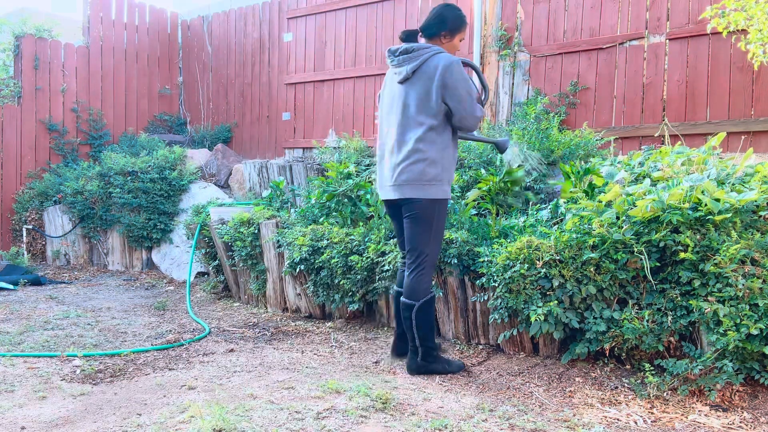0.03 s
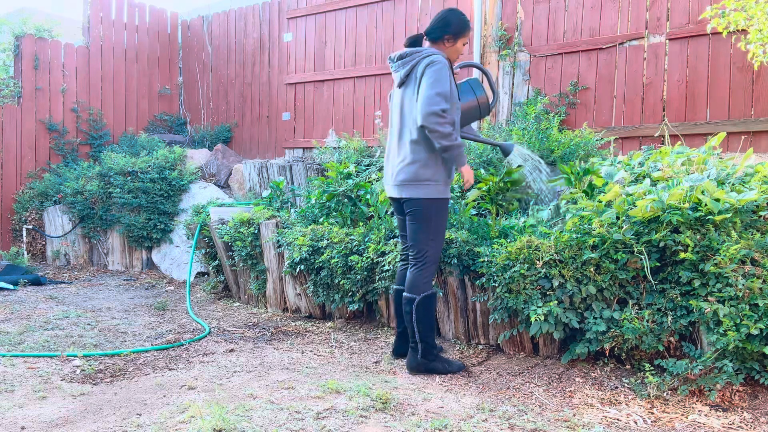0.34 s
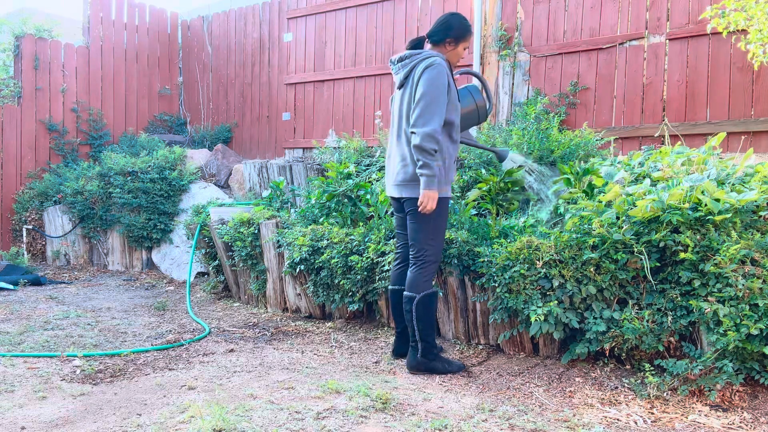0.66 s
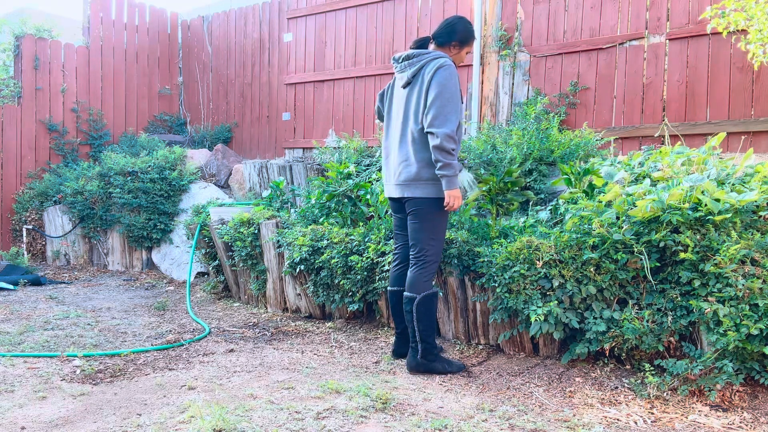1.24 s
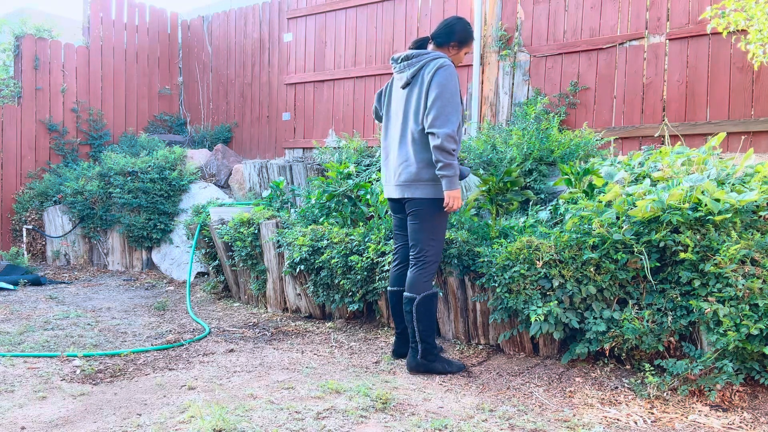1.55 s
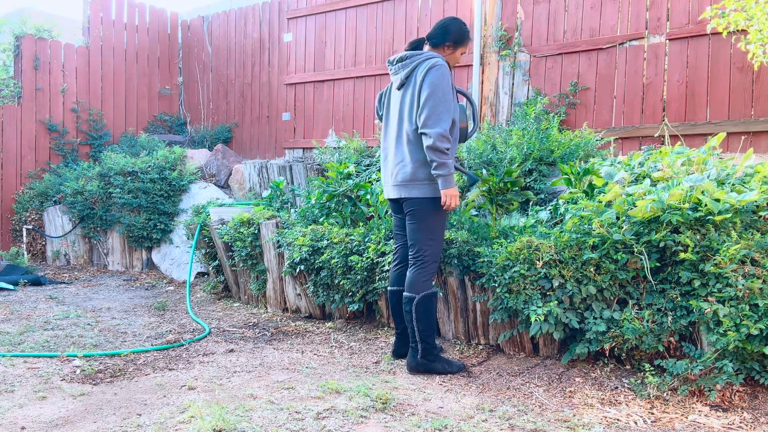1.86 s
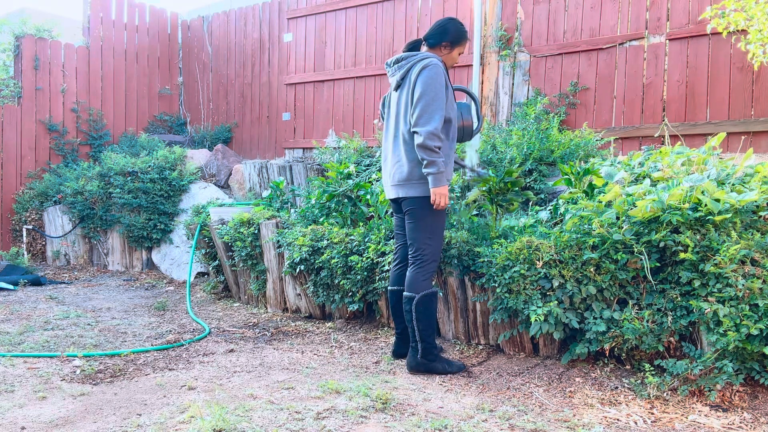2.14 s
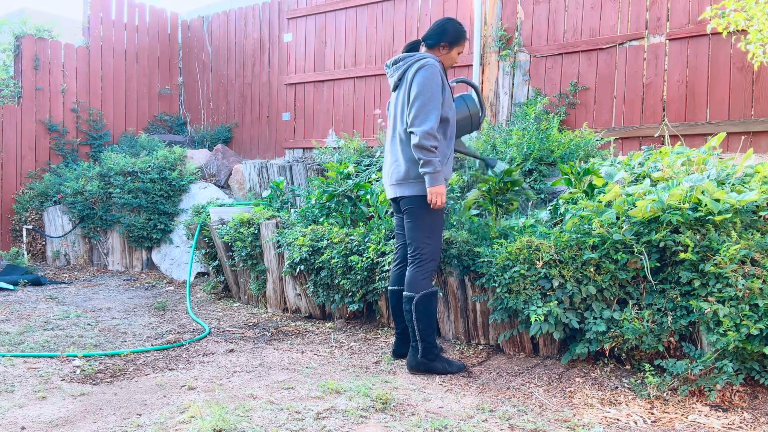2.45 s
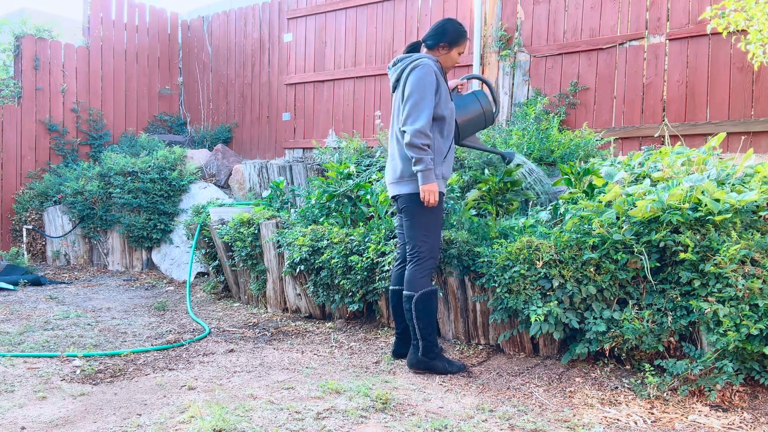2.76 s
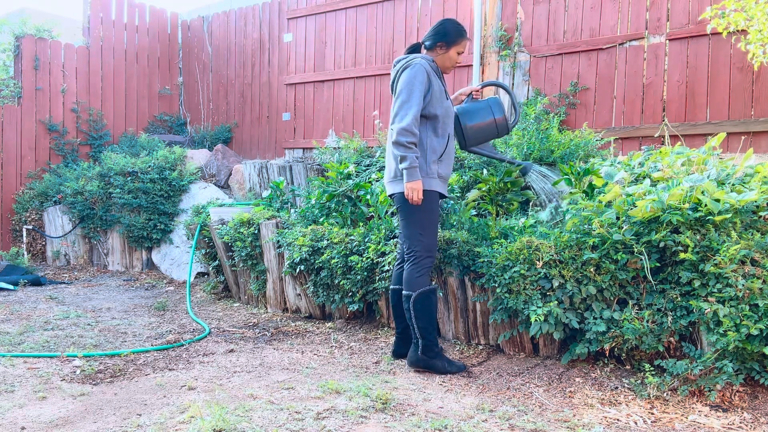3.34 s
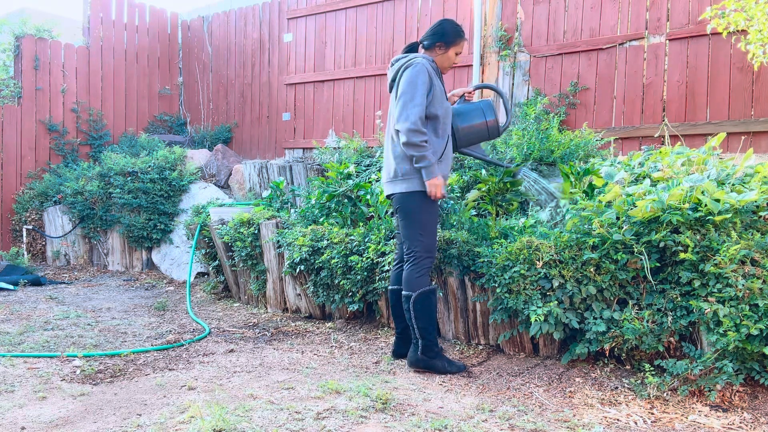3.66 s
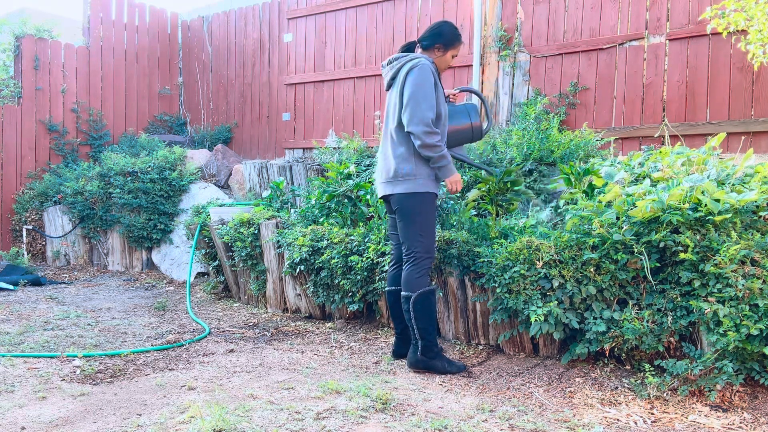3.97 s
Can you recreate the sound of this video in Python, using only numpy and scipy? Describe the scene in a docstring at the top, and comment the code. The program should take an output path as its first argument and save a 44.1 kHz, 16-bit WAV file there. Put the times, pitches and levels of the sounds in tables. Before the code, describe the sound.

A watering can sprinkles bushes, drops pattering softly on leaves. For the first second or so, rubber boots scuff and squeak on gritty soil. The spray thins from about 1.3 seconds and returns at 1.8, with small clicks and leaf rustles until 2.5. Gentle sprinkling continues to 4 seconds with scattered ticks. A steady low electric hum, distant rumble and outdoor air run throughout.

```python
"""Boots scuff on gritty soil with short squeaks: sand rings, crumbs crush, rubber soles rasp.
A watering can sprinkles bushes in a fenced yard, drops pattering on leaves over a soft wash.
The spray thins, leaves rustle as the can swings back, and the spray returns softly with small ticks.
A steady electric hum, a distant rumble and outdoor air lie underneath."""
import sys
import numpy as np
from scipy import signal
from scipy.fft import rfft, irfft
from scipy.io import wavfile
from scipy.ndimage import uniform_filter1d

SR = 44100
rng = np.random.default_rng(int(sys.argv[2]) if len(sys.argv) > 2 else 0)


def unload_wav(signal):
    """Save mono or channel-first audio to the path in sys.argv[1] as 16-bit WAV at rate SR, clipped to [-1, 1]."""
    wavfile.write(
        sys.argv[1],
        SR,
        np.round(np.clip(np.atleast_2d(signal).T, -1, 1) * 32767).astype(np.int16),
    )


N = 176400

# boot scuffs: t/s, length/s, grit level/dB, crunch level/dB, sole level/dB, sole start f/Hz, end f/Hz
BOOT_SCUFFS = [(0.0, 0.04, -67, -55, -55, 480, 850), (.027, 0.043, -50.5, -44.5, -49, 1200, 1710),
               (.068, 0.033, -58, -57, -55, 1610, 1310), (.098, 0.033, -49, -50, -52, 920, 700),
               (.138, .08, -51, -54, -53.5, 875, 1080), (.236, .025, -46.5, -57, -52.5, 910, 1080),
               (.265, 0.028, -57, -55, -53, 1490, 1040), (.298, 0.065, -57, -58.5, -56, 1100, 855),
               (.37, 0.063, -63.5, -61.5, -56.5, 1120, 604), (.45, 0.039, -64, -61, -58.5, 1040, 1580),
               (.493, 0.019, -51, -50, -53.5, 1520, 1370), (.52, .028, -60, -68, -67, 1500, 1500),
               (.563, 0.015, -52, -55, -48.5, 1360, 1250), (.587, .028, -52.5, -52.5, -48, 1170, 1020),
               (.618, 0.037, -60, -58, -55, 884, 840), (.775, 0.022, -65, -72, -59, 1750, 1530),
               (.826, 0.031, -59.5, -58.5, -52.5, 1050, 1310), (.868, 0.026, -65, -62, -57.5, 1580, 1790),
               (.993, 0.0193, -59, -65, -58, 1100, 1090), (1.15, 0.058, -70, -63.5, -55, 990, 1340)]
# sand sliding under a boot: f/Hz, relative level/dB
GRIT_SPECTRUM = [(1500, -13), (3000, -4), (4400, -8.5), (5600, -4.5), (6600, -1), (8000, -1), (9800, -2.5),
                 (11500, -20), (16000, -28)]
# sand grain resonances: f/Hz, width/Hz, gain
SAND_RINGS = [(5900, 110, 1.6), (6380, 120, 1.5), (6720, 120, 1.5), (7170, 130, 1.3), (7650, 100, 1.1)]
# crushed soil crumbs: f/Hz, relative level/dB
CRUNCH_SPECTRUM = [(300, -10.5), (1000, -4), (2200, -2.5), (3500, -6), (5500, -3.5), (9000, -9),
                   (12500, -13), (16000, -20)]
# spray landing on leaves: t/s, level/dB
SPRAY_LEVELS = [(0, -58.5), (.85, -60.5), (.93, -66.5), (1.1, -61), (1.35, -67), (1.55, -66.5), (1.68, -73),
                (1.82, -59.5), (2.4, -62), (2.7, -64.5), (3.02, -62), (3.15, -63.5), (3.35, -61.5),
                (3.7, -61), (4, -62.5)]
# fine drops on leaves: f/Hz, relative level/dB
DROP_SPECTRUM = [(300, -11), (900, -6.5), (1600, 0), (2500, 2.5), (4000, 0), (6500, -2), (10000, -5),
                 (12500, -10.5), (16000, -4.5)]
# wash of water in the bushes: t/s, level/dB
WASH_LEVELS = [(0, -60), (.9, -65), (1.25, -60.5), (1.7, -66), (2.15, -62.5), (2.4, -59.5), (2.9, -64),
               (3.3, -67.5), (4, -72)]
# electric hum lines: f/Hz, level/dB
HUM_LINES = [(120.0, -38), (178.9, -60.5), (196.7, -60.5), (238.5, -67.5), (250.2, -66.5), (310, -76.5),
             (417.4, -71.5), (447, -73), (676, -74.5), (1976, -81)]
# distant rumble: f/Hz, relative level/dB
RUMBLE_SPECTRUM = [(20, -20), (30, -21), (40, -9), (56, 3.5), (75, -0.5), (95, -3), (125, -1), (160, -7),
                   (200, -9), (250, -16), (320, -23), (600, -53.5)]
# outdoor air: f/Hz, relative level/dB
AIR_SPECTRUM = [(150, -10.5), (350, -4), (550, 4), (1050, -1), (1500, -4), (2200, -10), (4000, -17),
                (7500, -21), (10000, -19.5), (12500, -30), (15500, -25)]
# short squeaks during the boot scuffs, then small ticks: t/s, level/dB, f/Hz, width/oct, decay/s
SQUEAKS_AND_TICKS = [(.051, -43, 1610, 0.12, 0.012), (.056, -48, 2310, .08, .008),
                     (.081, -49, 5720, .02, .016), (.173, -45.5, 1964, 0.037, .014),
                     (.501, -48.5, 2800, 0.15, .009), (.571, -53, 2980, .08, .007),
                     (1.457, -58.5, 10000, .6, .003), (1.879, -49, 2600, .35, 0.0044),
                     (1.882, -44, 1210, .18, 0.0068), (1.923, -56, 11000, .15, .004),
                     (1.966, -48, 2480, 0.46, .007), (1.996, -52.5, 4630, 0.1, .005),
                     (2.073, -50.5, 4400, .3, 0.0036), (2.083, -52, 4300, .2, .004),
                     (2.306, -56, 7000, .4, .002), (2.322, -54, 13500, .16, .012),
                     (2.457, -57, 9000, 0.78, 0.0027), (2.73, -61, 10000, .5, .003),
                     (2.992, -57, 7000, 0.43, .004), (3.004, -58, 9500, .3, .004),
                     (3.68, -60, 4300, .12, .008), (3.729, -60, 3900, 0.26, .005),
                     (3.787, -58, 11000, .4, .003), (3.877, -45, 3100, 0.21, 0.007),
                     (3.92, -51.5, 8000, 0.74, .003), (3.991, -57, 10000, .5, .003)]
# leaves brushing past the can: t/s, length/s, level/dB, centre f/Hz
LEAF_RUSTLES = [(1.79, 0.13, -69, 8000), (1.963, 0.015, -54, 6400), (1.99, .04, -65, 5000),
                (2.048, 0.038, -57.5, 6500), (2.095, 0.047, -57, 9200), (2.145, 0.044, -58.5, 6960),
                (2.2, .05, -73, 8000), (2.26, 0.063, -62, 7000), (2.45, 0.027, -60, 7450),
                (3.285, 0.048, -64, 7500), (3.398, 0.027, -61.5, 4800), (3.63, .035, -64, 7000),
                (3.92, .035, -64, 7000)]

GRAINS_PER_S, GRAIN_SPREAD_DB = 10000, 2.5


def amp(db):
    """Decibels to gain."""
    return 10 ** (np.asarray(db) / 20)


def unit(x):
    """Scales to rms 1."""
    return x / np.sqrt(np.mean(x ** 2) + 1e-20)


def add(mix, start_s, sound):
    """Mixes a sound in at start_s."""
    part = mix[max(round(start_s * SR), 0):][:len(sound)]
    part += sound[:len(part)]


def colour(x, spectrum):
    """Filters by an f/Hz, level/dB table; rms 1."""
    hz, db = np.transpose(spectrum)
    bin_hz = np.fft.rfftfreq(len(x), 1 / SR)
    gain = amp(np.interp(np.log(bin_hz + 1), np.log(hz), db))
    return unit(irfft(rfft(x) * gain, len(x)))


def band(x, hz, width_oct):
    """Bell-shaped band around hz; rms 1."""
    bin_hz = np.fft.rfftfreq(len(x), 1 / SR)
    offset_oct = np.log2((bin_hz + 1) / hz)
    return unit(irfft(rfft(x) * np.exp(-.5 * (offset_oct / width_oct) ** 2), len(x)))


def resonate(x, hz, width_hz):
    """Resonance following the pitch curve hz; rms 1."""
    carrier = np.exp(2j * np.pi * np.cumsum(hz) / SR)
    pole = np.exp(-np.pi * width_hz / SR)
    baseband = signal.lfilter([1], [1, -2 * pole, pole * pole], x / carrier)
    return unit((carrier * baseband).real)


def clicks(size, per_s, spread_db):
    """Random tiny impacts, most weak, a few strong."""
    strength = amp(spread_db * np.minimum(rng.exponential(1, size), 4.5))
    return strength * rng.choice([-1, 1], size) * (rng.random(size) < per_s / SR)


def patchy(x, depth_db, patch_hz, patch_s):
    """Clumps a sound: short random patches of spectrum rise or drop; rms 1."""
    size, hop = 256, 64
    spectra = signal.stft(x, nperseg=size, noverlap=size - hop)[2]
    bins = max(round(patch_hz * size / SR), 1)
    frames = max(round(patch_s * SR / hop), 1)
    field = uniform_filter1d(rng.standard_normal(spectra.shape), bins, axis=0)
    field = unit(uniform_filter1d(field, frames, axis=1))
    clumped = signal.istft(spectra * amp(depth_db * field), nperseg=size, noverlap=size - hop)[1]
    return unit(clumped[:len(x)])


def stroke(length_s, attack_s, release_s):
    """Envelope: rise, hold until length_s, decay."""
    t = np.arange(0, length_s + 6 * release_s, 1 / SR)
    return np.minimum(t / attack_s, 1) * np.exp(-np.maximum(t - length_s, 0) / release_s)


def boot_scuff(length_s, grit_db, crunch_db, sole_db, start_hz, end_hz):
    """A boot slides on soil: ringing sand, crushed crumbs, sole rasp."""
    env = stroke(length_s, attack_s=.0068, release_s=.008)
    sand, crumbs = (clicks(len(env), GRAINS_PER_S, GRAIN_SPREAD_DB) for _ in range(2))
    sand = sand + sum(gain * signal.lfilter(*signal.iirpeak(hz, hz / width_hz, SR), sand)
                      for hz, width_hz, gain in SAND_RINGS)
    sand, crumbs = (patchy(x, depth_db=3, patch_hz=500, patch_s=.022) for x in (sand, crumbs))
    grit = amp(grit_db) * colour(sand, GRIT_SPECTRUM)
    crunch = amp(crunch_db) * colour(crumbs, CRUNCH_SPECTRUM)
    sole = amp(sole_db) * sole_rasp(len(env), length_s, start_hz, end_hz)
    return env * (grit + crunch + sole)


def sole_rasp(size, length_s, start_hz, end_hz, ring_share=.52):
    """A rubber sole rasps; its resonance glides as the foot rolls."""
    hz = np.interp(np.arange(size) / SR, [0, length_s], [start_hz, end_hz])
    ring = resonate(clicks(size, GRAINS_PER_S, GRAIN_SPREAD_DB), hz, width_hz=150)
    rasp = band(clicks(size, GRAINS_PER_S, GRAIN_SPREAD_DB), (start_hz + end_hz) / 2, width_oct=.86)
    return np.sqrt(ring_share) * ring + np.sqrt(1 - ring_share) * rasp


def spray(taps_db=-8):
    """Fine and big drops patter on leaves, louder as the can tips, over a soft wash."""
    t = np.arange(N) / SR
    spray_db = np.interp(t, *np.transpose(SPRAY_LEVELS))
    wash_db = np.interp(t, *np.transpose(WASH_LEVELS))
    drops = patchy(clicks(N, per_s=2500, spread_db=2), depth_db=2.5, patch_hz=1400, patch_s=.03)
    patter = colour(drops, DROP_SPECTRUM) + amp(taps_db) * leaf_taps()
    wash = band(rng.standard_normal(N), hz=1030, width_oct=.46)
    return amp(spray_db) * patter + amp(wash_db) * wash


def leaf_taps(leaves=24, low_hz=3490, high_hz=11600, decay_cycles=5.9, taps_per_s=400):
    """Big drops each ring one leaf briefly at its own pitch."""
    t = np.arange(SR // 50) / SR
    taps = np.zeros(N)
    for hz in np.geomspace(low_hz, high_hz, leaves):
        ring = np.sin(2 * np.pi * hz * t) * np.exp(-hz * t / decay_cycles)
        hits = clicks(N, taps_per_s / leaves, spread_db=3)
        taps += signal.oaconvolve(hits, ring)[:N]
    return unit(taps)


def electric_hum():
    """Steady sine lines at random phases, strongest at 120 Hz."""
    t = np.arange(N) / SR
    return sum(amp(db) * np.sqrt(2) * np.sin(2 * np.pi * (hz * t + rng.random()))
               for hz, db in HUM_LINES)


def distant_rumble(level_db=-47):
    """Steady low noise."""
    return amp(level_db) * colour(rng.standard_normal(N), RUMBLE_SPECTRUM)


def outdoor_air(level_db=-56.5):
    """Steady broad noise, strongest in the midrange."""
    return amp(level_db) * colour(rng.standard_normal(N), AIR_SPECTRUM)


def squeak_or_tick(level_db, hz, width_oct, decay_s, attack_s=.0011, skirt_db=-15):
    """Resonant noise burst: a squeak if narrow and longer, a tick if wide and brief."""
    env = stroke(attack_s, attack_s, decay_s)
    noise = rng.standard_normal(len(env))
    skirt = amp(skirt_db) * band(noise, hz, width_oct=1)
    return amp(level_db) * env * (band(noise, hz, width_oct) + skirt)


def leaf_rustle(length_s, level_db, hz):
    """Leaves brush the can: a short clump of fine crackles."""
    env = stroke(length_s, attack_s=.005, release_s=.0076)
    crackles = clicks(len(env), per_s=2500, spread_db=2)
    crackles = patchy(crackles, depth_db=4.5, patch_hz=1200, patch_s=.017)
    return amp(level_db) * env * band(crackles, hz, width_oct=.74)


def yard_scatter(x, t60_s=.13, gain_db=-9.5, gap_s=.003):
    """Short reflections from ground and fence."""
    t = np.arange(SR // 2) / SR
    tail = clicks(len(t), per_s=1500, spread_db=1.3) * amp(-60 * t / t60_s) * (t > gap_s)
    return amp(gain_db) * signal.fftconvolve(x, tail / np.linalg.norm(tail))[:N]


def scene():
    """Near sounds and their reflections over hum, rumble and air; mono."""
    near = spray()
    events = (BOOT_SCUFFS, boot_scuff), (LEAF_RUSTLES, leaf_rustle), (SQUEAKS_AND_TICKS, squeak_or_tick)
    for table, source in events:
        for start_s, *row in table:
            add(near, start_s, source(*row))
    return (near + yard_scatter(near) + electric_hum() + distant_rumble() + outdoor_air())[None]


def record(dry):
    """Steep low-pass on the top treble."""
    cutoff_hz = 15800
    lowpass = signal.firwin(511, cutoff_hz, window=("kaiser", 9), fs=SR)
    return signal.oaconvolve(dry, lowpass[None], "same")


dry = scene()
out = record(dry)
unload_wav(out)
```